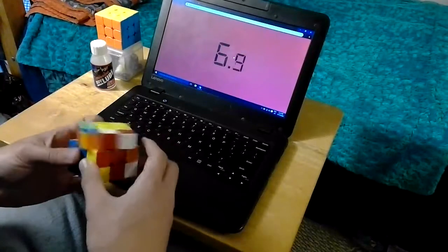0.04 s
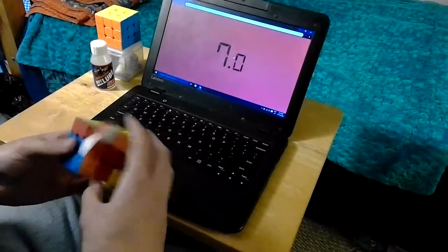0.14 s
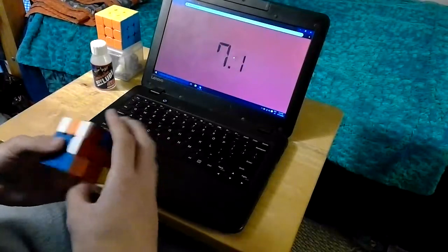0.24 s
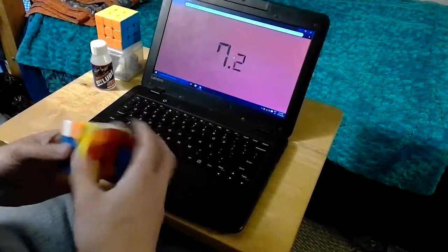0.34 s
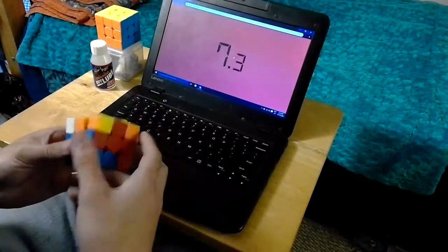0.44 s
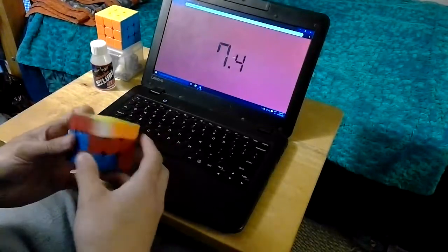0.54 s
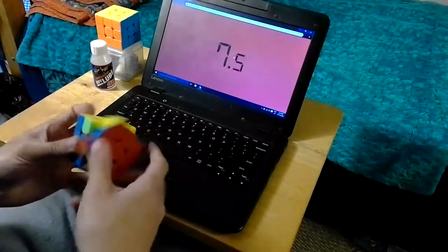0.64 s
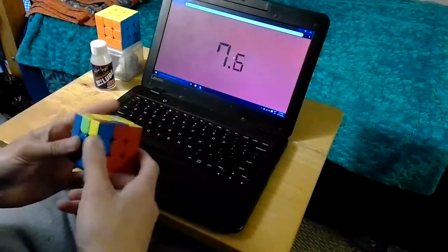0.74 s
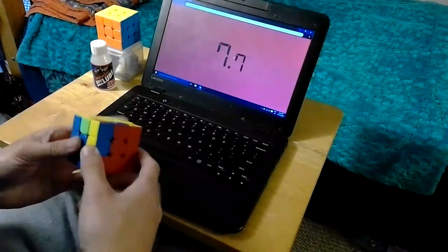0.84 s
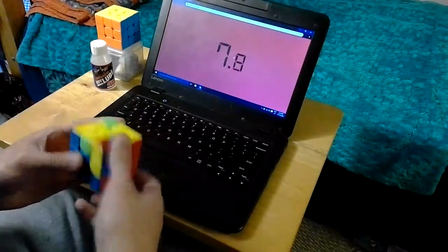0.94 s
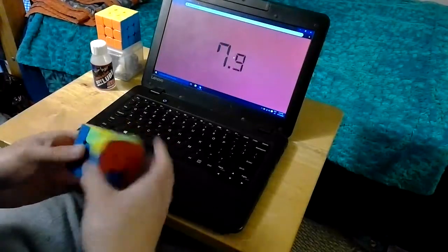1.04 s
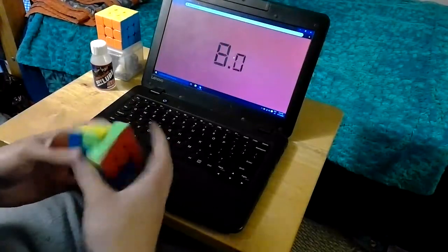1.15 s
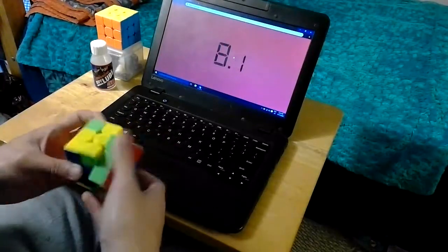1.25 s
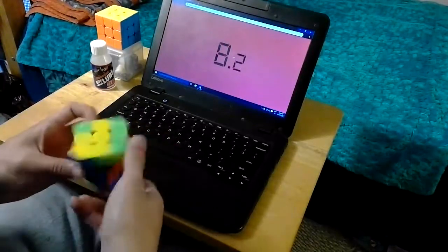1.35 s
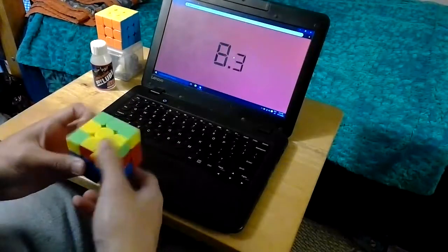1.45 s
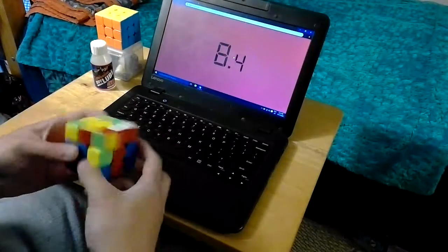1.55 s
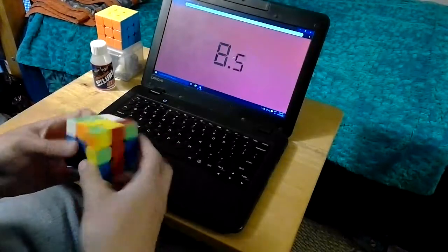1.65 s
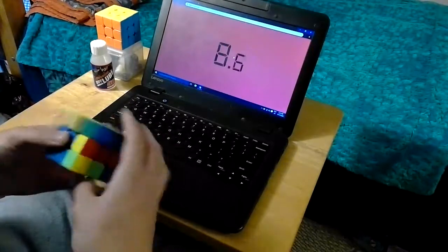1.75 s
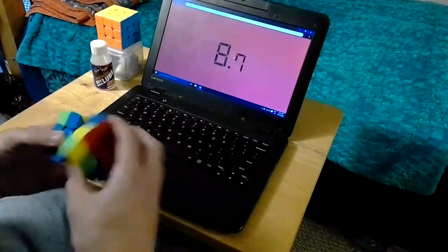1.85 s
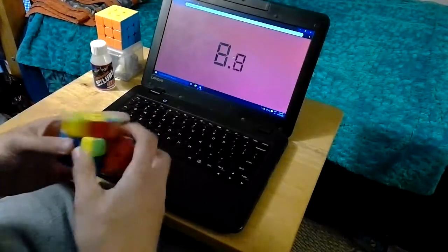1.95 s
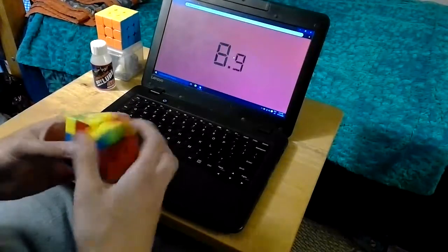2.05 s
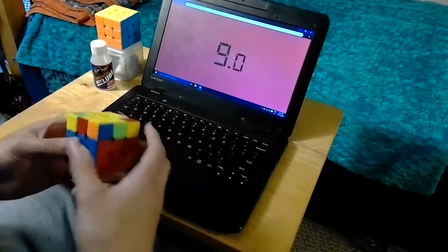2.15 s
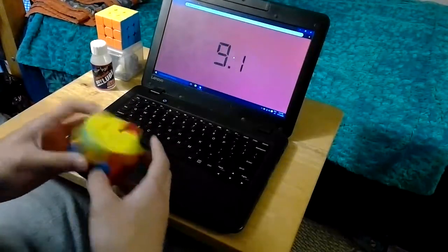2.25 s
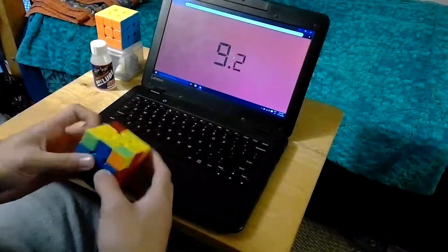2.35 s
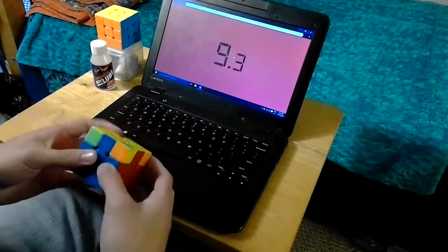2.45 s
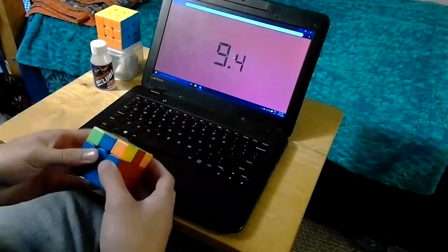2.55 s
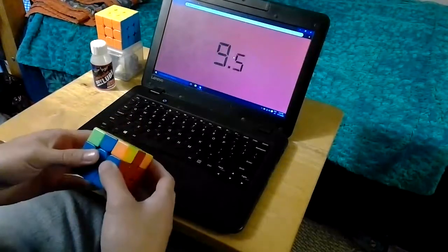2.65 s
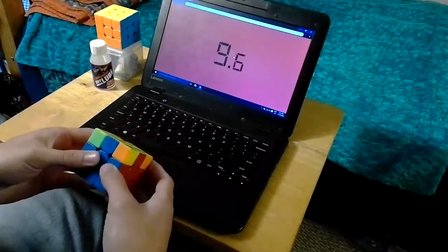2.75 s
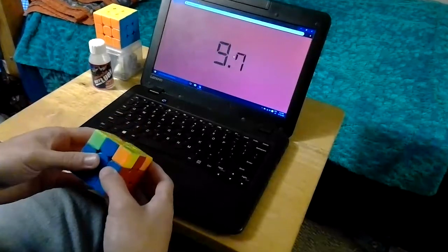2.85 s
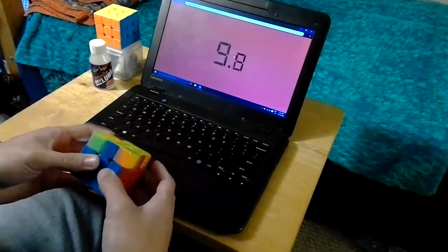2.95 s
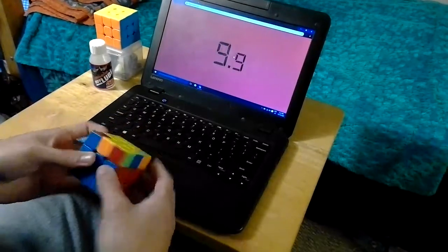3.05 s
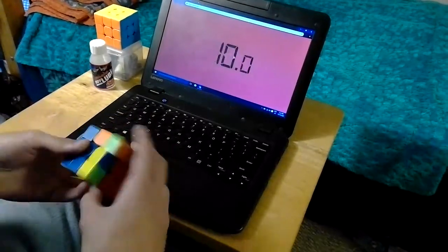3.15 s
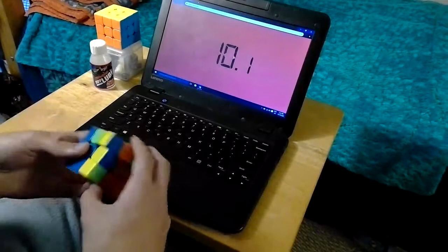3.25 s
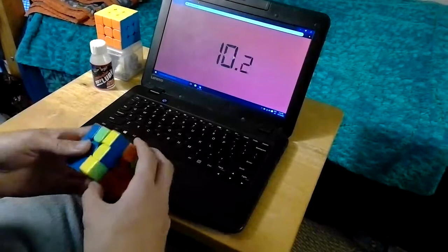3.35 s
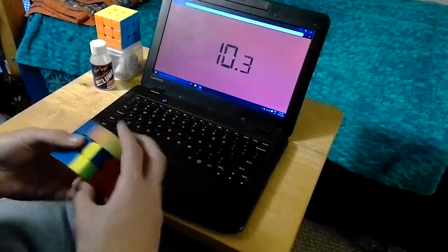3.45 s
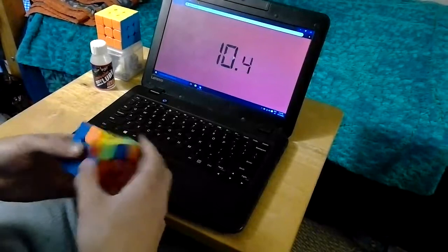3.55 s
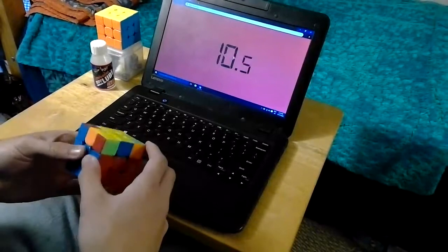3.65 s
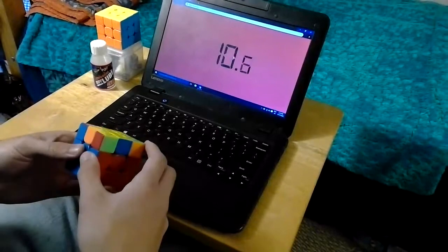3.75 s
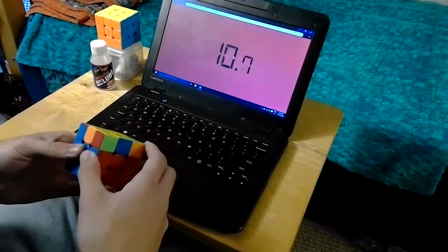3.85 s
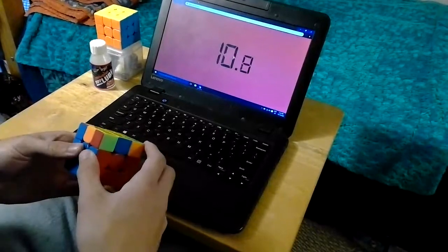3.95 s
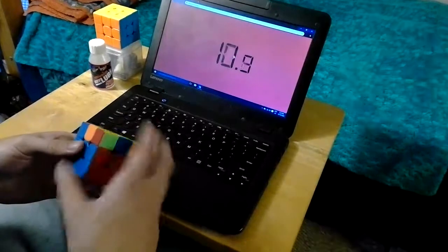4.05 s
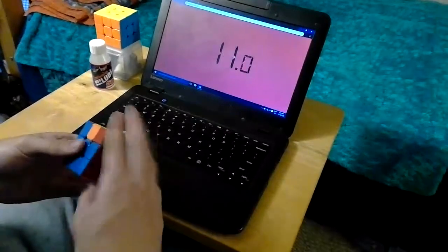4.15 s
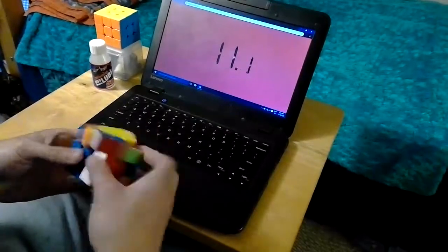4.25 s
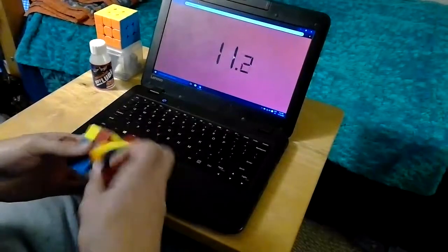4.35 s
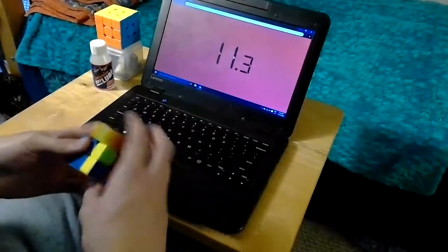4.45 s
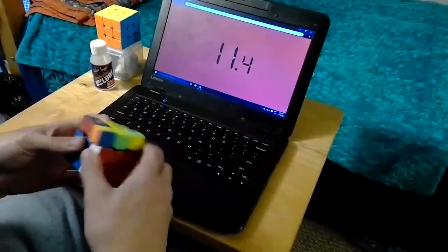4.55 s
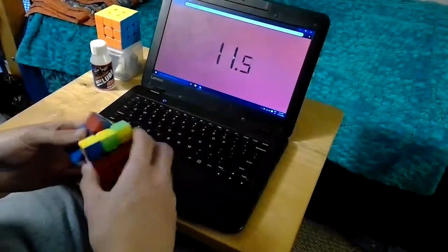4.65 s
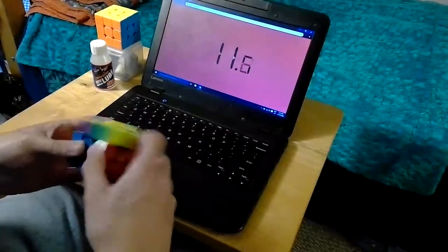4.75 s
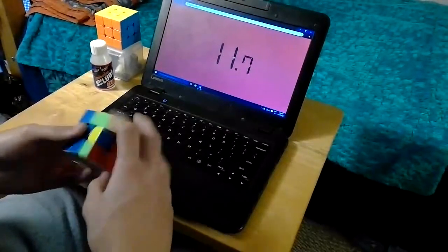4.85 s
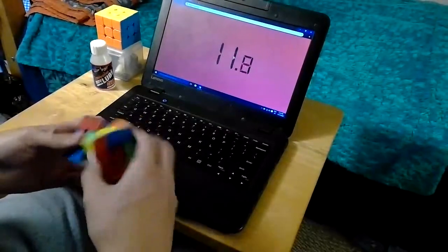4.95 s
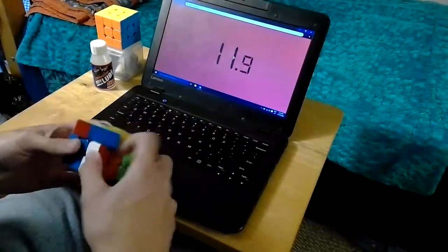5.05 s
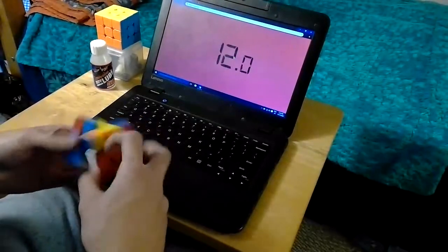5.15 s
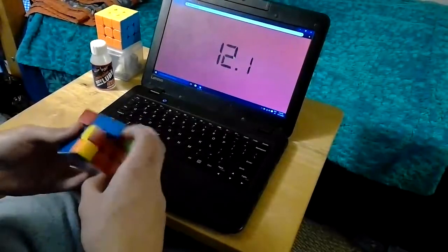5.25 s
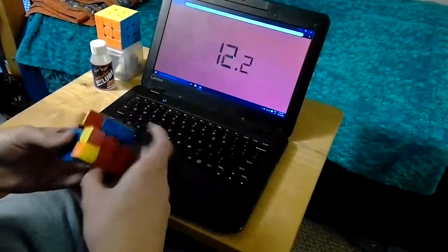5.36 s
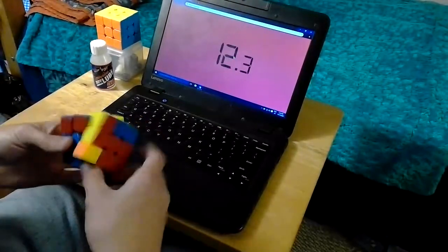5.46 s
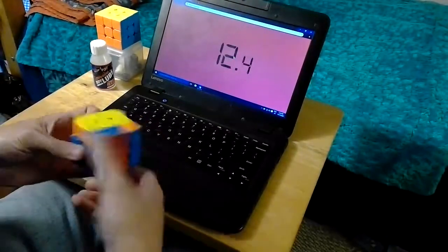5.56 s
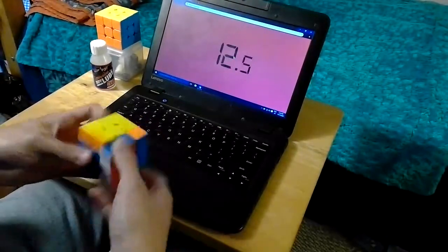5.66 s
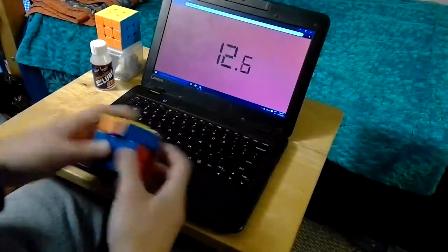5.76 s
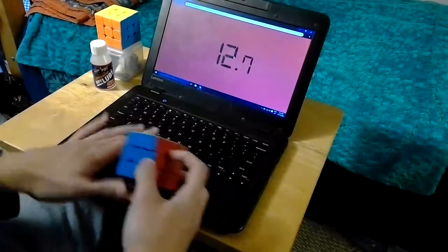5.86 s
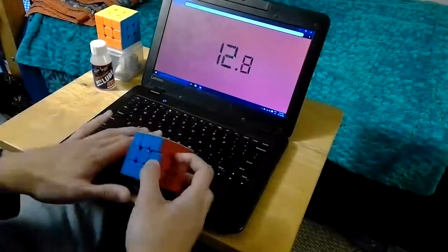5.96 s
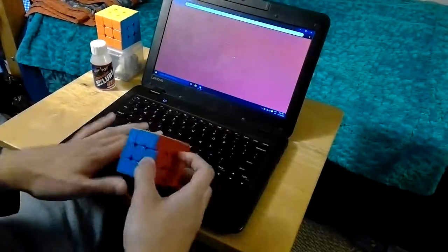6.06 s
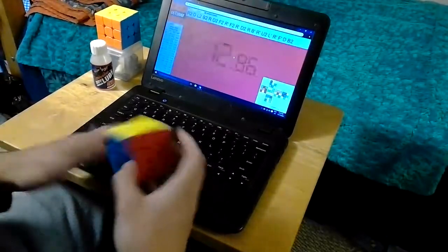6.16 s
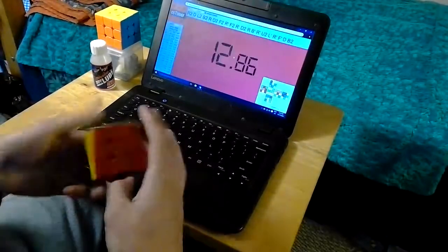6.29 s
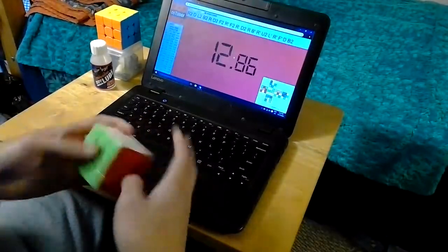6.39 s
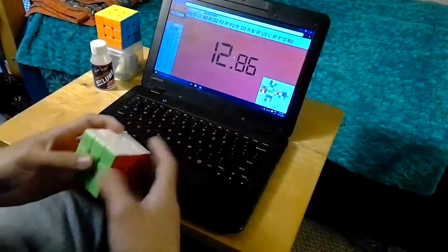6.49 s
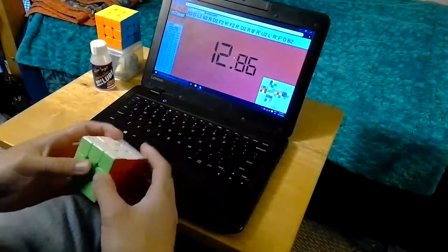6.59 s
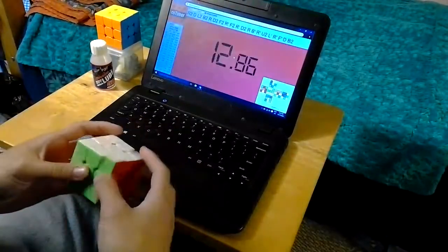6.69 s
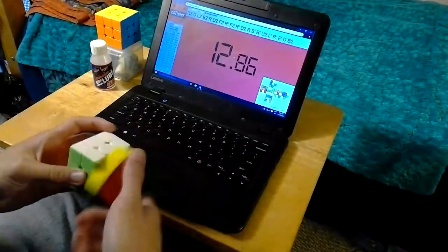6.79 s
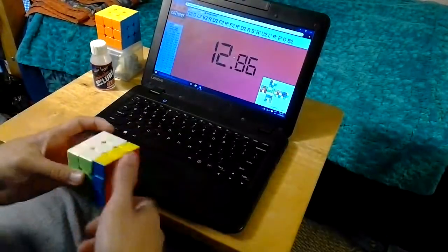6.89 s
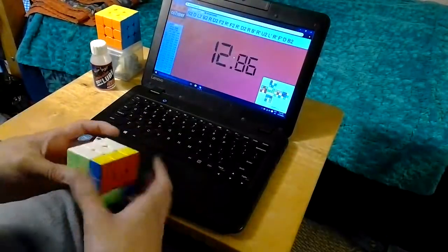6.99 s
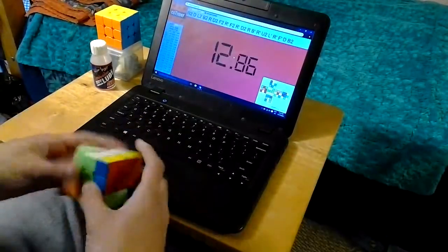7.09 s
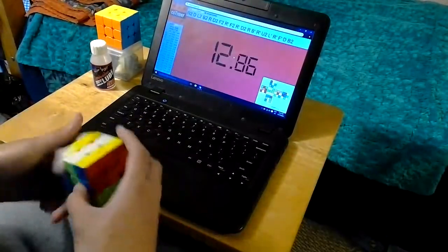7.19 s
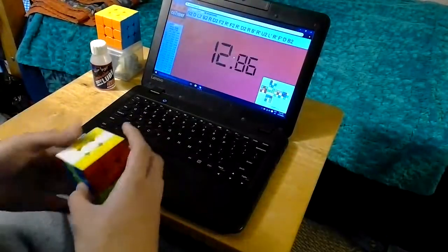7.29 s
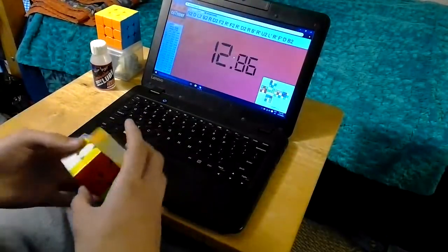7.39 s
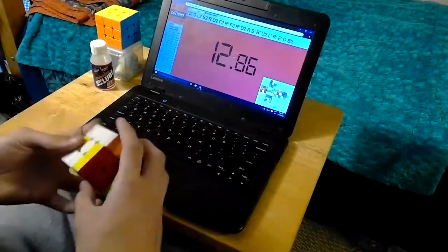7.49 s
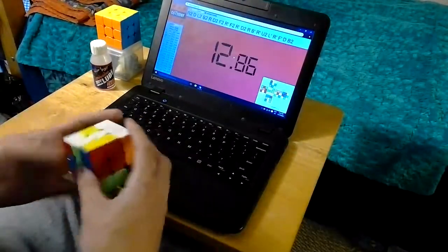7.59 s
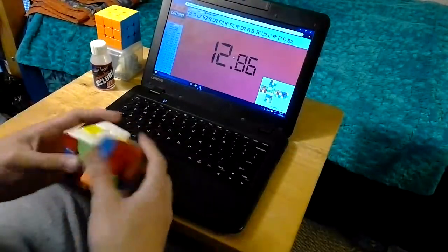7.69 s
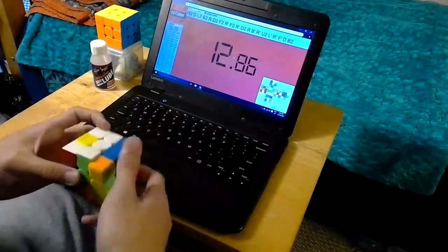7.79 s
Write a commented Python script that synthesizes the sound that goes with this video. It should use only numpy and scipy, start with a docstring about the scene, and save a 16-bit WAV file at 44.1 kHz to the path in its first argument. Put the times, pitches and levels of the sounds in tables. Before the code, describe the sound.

Close to the microphone in a small room, a plastic puzzle cube is turned in quick, uneven bursts of dry rasping, ticking and hollow clacks. After short pauses the turning becomes dense and louder, then a hand slaps laptop keys with a cracking thud. Softer, sparser twists follow over faint hiss and a very thin electronic whine.

```python
"""Over a faint hiss and whine, a plastic speed cube is twisted in fast bursts above a desk in a small room.
Sliding layers rasp by stick-slip, loose pieces tick, and clacks ring the shell as layers snap into line.
At one point a hand slaps the laptop's keys, cracking the plastic and thudding the desk, then shifts softly.
Nudges set the camera's stand swaying in decaying low sines; hands and sleeves brush as soft low noise.
Desk, screen and walls add dense, decaying echoes."""
import sys
import numpy as np
from scipy import signal
from scipy.fft import rfft, irfft, next_fast_len
from scipy.io import wavfile

SR = 44100
rng = np.random.default_rng(int(sys.argv[2]) if len(sys.argv) > 2 else 0)


def waveform_to_disk(signal):
    """Save audio, clipped to [-1, 1], as 16-bit WAV at the path in sys.argv[1]."""
    frames = np.transpose(np.atleast_2d(signal))
    scaled = np.clip(frames, -1, 1) * 32767
    samples = np.round(scaled).astype(np.int16)
    wavfile.write(sys.argv[1], SR, samples)


N = 345303
LEAD_S = 0.008  # time kept ahead of each clack for its leading scrape


def amp(db):
    """Logarithmic level: decibels to amplitude gain."""
    return 10 ** (np.asarray(db) / 20)


def unit(x):
    """Root-mean-square normalisation: scale to rms 1."""
    return x / np.sqrt(np.mean(x ** 2) + 1e-20)


def along(points, hz):
    """Logarithmic pitch scale: interpolate (frequency [Hz], value) points on a log axis."""
    f, v = np.transpose(points)
    return np.interp(np.log(hz + 1), np.log(f), v)


def filtered(x, response):
    """Linear filtering: multiply the spectrum of x by a response of frequency."""
    m = next_fast_len(len(x) + SR // 4)
    spectrum = rfft(x, m) * response(np.fft.rfftfreq(m, 1 / SR))
    return irfft(spectrum, m)[:len(x)]


def causal(gain):
    """Minimum phase: folding the cepstrum gives a response that rings only after it is struck."""
    cepstrum = irfft(np.log(np.maximum(gain, 1e-6)))
    half = cepstrum.shape[-1] // 2
    cepstrum[..., 1:half] *= 2
    cepstrum[..., half + 1:] = 0
    return np.exp(rfft(cepstrum))


def hump(hz, centre_hz, width_hz):
    """Resonance: a bell-shaped gain that is 1 at its centre."""
    return 1 / (1 + (2 * (hz - centre_hz) / width_hz) ** 2)


def add(track, s, sound):
    """Superposition: mix a sound into the track at time s."""
    start = int(np.clip(round(s * SR), 0, N - 1))
    track[start:start + len(sound)] += sound[:N - start]


def background(air_db=-67, whine_base_hz=825.65):
    """Stationary noise and harmonic tones: room air, microphone hiss and a thin electronic whine."""
    # spectrum of the air and hiss: (frequency [Hz], relative level [dB])
    air_spectrum = [(10, -10.5), (25, 0.5), (40, -7), (65, -14.5), (130, -22), (250, -27), (450, -32.5),
                    (1000, -36.5), (2500, -41.5), (6000, -42.5), (10000, -35), (14500, -35), (15700, -28.5),
                    (16000, -28.5)]
    # electronic whine: (multiple of the base pitch, rms level [dB])
    whine_tones = [(3, -99), (6, -94), (8, -94), (10, -92), (11, -84), (12, -98.5), (13, -92.5),
                   (14, -87.5), (15, -99), (17, -98), (19, -91)]
    t = np.arange(N) / SR
    air = unit(filtered(rng.standard_normal(N), lambda hz: amp(along(air_spectrum, hz))))
    whine = np.zeros(N)
    for multiple, db in whine_tones:
        cycles = multiple * whine_base_hz * t + rng.random()
        whine += amp(db) * np.sqrt(2) * np.sin(2 * np.pi * cycles)
    return amp(air_db) * air + whine


def handling(sway_hz=22.25, sway_t60=2.27, rise_s=0.028, brush_s=0.062, brush_hz=240, brush_width_hz=260):
    """Damped oscillation and friction noise: the nudged stand sways; hands and sleeves give soft low puffs."""
    # nudges of the camera stand: (time [s], sway level [dB])
    nudge_times = [(0.548, -50), (1.168, -52), (1.842, -58), (2.64, -51.5)]
    # soft brushes of hands and sleeves: (time of peak [s], level [dB])
    brush_times = [(.47, -75.5), (.83, -78.5), (1.2, -73), (1.88, -74.5), (4.3, -87), (4.9, -72.5)]
    t = np.arange(N) / SR
    track = np.zeros(N)
    sway_envelope = amp(-60 * t / sway_t60) * (1 - np.exp(-t / rise_s))
    sway = np.sin(2 * np.pi * sway_hz * t) * sway_envelope
    for s, db in nudge_times:
        add(track, s, amp(db) * sway)
    cloth = unit(filtered(rng.standard_normal(N), lambda hz: hump(hz, brush_hz, brush_width_hz)))
    strokes = sum(amp(db) * np.exp(-((t - s) / brush_s) ** 2) for s, db in brush_times)
    return track + cloth * strokes


def room(x, size=4096, delay_s=0.0045, build_s=0.0027, echo_db=5.0, echo_s=0.0012):
    """Reverberation: desk, screen and walls return echoes that change block by block as the cube moves."""
    # decay of the room: (frequency [Hz], t60 [s])
    wall_decay = [(150, 0.21), (1500, 0.19), (6000, 0.12), (15000, 0.11)]
    wet = np.zeros(N)
    for start in range(0, N, size):
        # treble dies away sooner than bass
        hz, t, z = signal.stft(rng.standard_normal(SR // 3), SR, nperseg=256)
        decay = amp(-60 * t / along(wall_decay, hz)[:, None])
        tail = signal.istft(z * decay, SR)[1]
        t = np.arange(len(tail)) / SR
        # uneven echo strength, then the wait and build-up before the echoes are dense
        unevenness = np.interp(t / echo_s, np.arange(len(t)), rng.standard_normal(len(t)))
        build = 1 - np.exp(-np.maximum(t - delay_s, 0) / build_s)
        tail = tail * amp(echo_db * unevenness) * build
        add(wet, start / SR, signal.fftconvolve(x[start:start + size], tail / np.linalg.norm(tail)))
    return wet


def contact(t, chatter, chatter_s, lead, lead_s, hit_s, press_s=0.00014):
    """Impact force at t = 0: a scrape leading in, a sharp blow, loose pieces chattering after."""
    before, after = np.maximum(-t, 0), np.maximum(t, 0)
    blow = unit(rng.standard_normal(len(t)) * np.exp(-before / press_s - after / hit_s))
    # random strength makes the noise spiky
    loose = rng.standard_normal(len(t)) * np.sqrt(rng.exponential(size=len(t)))
    rattle = unit(loose * (t >= 0) * np.exp(-after / chatter_s))
    scrape = unit(loose * (t < 0) * np.exp(-before / lead_s))
    return blow + chatter * rattle + lead * scrape


def blows(size=16384, keys_db=-11, keys_hz=850, keys_width_hz=1100, keys_t60=0.12):
    """Modal impact: a hard plastic crack over decaying laptop and desk modes; shaken keys chatter on."""
    # blows on the laptop's keys: (time [s], crack level [dB], thud level [dB])
    blow_times = [(5.816, -21.5, -37), (6.059, -54.5, -62.5)]
    # laptop and desk modes: (frequency [Hz], level within the thud [dB], t60 [s])
    desk_modes = [(70.7, -20, .2), (155, -21.5, 0.146), (321, -10, 0.045), (580, -5.5, 0.033),
                  (688, 0, 0.024), (834, -6.5, 0.051), (1103, -12, 0.022), (1686, -10.5, 0.034)]
    # colour of the crack: (frequency [Hz], relative gain [dB])
    shell_points = [(100, -22.5), (500, -7), (2700, -5.5), (4300, -0.5), (6500, -4), (12500, 1.5), (16000, -1.0)]
    track, hz = np.zeros(N), np.fft.rfftfreq(size, 1 / SR)
    early_s, span_s = 0.004, 0.004  # lead-in; duration over which the crack level is stated
    t = np.arange(size) / SR - early_s
    after = np.maximum(t, 0)
    shell = causal(amp(along(shell_points, hz)))
    for s, crack_db, thud_db in blow_times:
        force = contact(t, chatter=0.66, chatter_s=0.0026, lead=0.47, lead_s=0.0018, hit_s=0.0012)
        crack = unit(irfft(rfft(force) * shell)) * np.sqrt(span_s * SR / size)
        thud = np.zeros(size)
        for f, db, t60 in desk_modes:
            thud += rng.choice([-1, 1]) * amp(db - 60 * after / t60) * np.sin(2 * np.pi * f * after)
        keys = unit(filtered(rng.standard_normal(size), lambda f: hump(f, keys_hz, keys_width_hz)))
        keys = keys * (t > 0) * amp(-60 * after / keys_t60)
        add(track, s - early_s, amp(crack_db) * crack + amp(thud_db) * (thud + amp(keys_db) * keys))
    return track


def effort(rise_db_per_s, fall_db_per_s):
    """Exponential attack and decay: every flick rises, holds while the layer moves, then falls away."""
    # flicks of a layer: (start [s], length [s], drive level [dB], before the gain of each sound it drives)
    turn_times = [(0, 0.017, -56.5), (0.081, 0.058, -53.5), (0.161, 0.035, -51), (0.284, 0.035, -50),
                  (0.35, 0.068, -55.5), (0.475, 0.039, -45.0), (0.552, 0.037, -56.5), (0.614, 0.068, -53.5),
                  (0.991, 0.017, -48), (1.043, 0.057, -59), (1.247, 0.081, -62.5), (1.307, 0.016, -41),
                  (1.44, 0.054, -55.5), (1.542, 0.051, -55), (1.65, 0.055, -53), (1.707, 0.037, -43),
                  (1.82, 0.032, -56), (1.881, 0.06, -53), (1.999, 0.039, -53.5), (2.233, 0.021, -53),
                  (2.955, 0.012, -50), (3.07, 0.04, -56.5), (3.148, 0.03, -48), (3.387, 0.062, -51.5),
                  (3.511, 0.011, -49), (4.133, 0.12, -57.5), (4.255, 0.043, -39.5), (4.3, 0.041, -43.5),
                  (4.373, 0.074, -46.5), (4.468, 0.036, -46.5), (4.552, 0.055, -53), (4.611, 0.013, -40.5),
                  (4.696, 0.069, -44), (4.788, 0.029, -47), (4.846, 0.1, -50), (4.975, 0.061, -57),
                  (5.132, 0.012, -47), (5.187, 0.069, -55), (5.284, 0.074, -59.5), (5.398, 0.083, -53),
                  (5.471, 0.057, -43.5), (5.641, 0.068, -54), (5.738, 0.021, -38.5), (6.058, 0.011, -60),
                  (6.709, 0.052, -49.5), (6.778, 0.036, -61.5), (6.928, 0.12, -59), (7.08, 0.031, -48.5),
                  (7.124, 0.029, -43.5), (7.333, 0.015, -47), (7.388, 0.092, -56.5), (7.651, 0.076, -55)]
    t = np.arange(N) / SR
    level_db = np.full(N, -140.0)
    for s, length, db in turn_times:
        rise_db = rise_db_per_s * np.maximum(s - t, 0)
        fall_db = fall_db_per_s * np.maximum(t - s - length, 0)
        level_db = np.maximum(level_db, db - rise_db - fall_db)
    return amp(level_db)


def cube_gain(hz, shift=1):
    """Cavity resonance: thin plastic around small cavities, whose pitch shifts as gaps open and close."""
    # colour of the hollow plastic: (frequency [Hz], relative gain [dB])
    plastic_points = [(60, -40.5), (300, -23.5), (700, -15), (1200, -12.5), (1450, -4.5), (1850, -7.5),
                      (2250, -10.5), (3900, -7.5), (5000, -2.5), (6700, 1), (9500, 0), (12000, -0.5),
                      (14000, -1), (16000, -6.5)]
    # air cavity and wall resonances: (centre before the shift [Hz], width [Hz], added gain [dB])
    cavity_modes = [(1664, 110, -3.5), (3077, 95, 0.5), (6550, 230, -20.5)]
    resonance = sum(amp(db) * hump(hz, c * shift, w) for c, w, db in cavity_modes)
    return amp(along(plastic_points, hz)) * (1 + resonance)


def sliding(size=1024, rasp_db=-6, catches_per_s=400, catch_s=0.00065, scatter_db=5, smooth=0.074,
            tilt_db_per_octave=-1.5, start_db_per_s=1700, stop_db_per_s=898.5):
    """Stick-slip friction: layers catch hundreds of times a second, each catch a tiny burst of noise."""
    hz = np.fft.rfftfreq(size, 1 / SR)
    # the ridges pass at an uneven pace
    pace = np.repeat(rng.exponential(size=N // 64 + 1), 64)[:N]
    ridges = np.floor(np.cumsum(pace) * catches_per_s / SR)
    strength = amp(scatter_db * np.clip(rng.standard_normal(N), -2, 2))
    catches = (np.diff(ridges, prepend=0) > 0) * strength
    # each catch dies away exponentially over a little steady friction
    grip = unit(signal.lfilter([1], [1, -np.exp(-1 / (catch_s * SR))], catches)) + smooth
    tilt = amp(tilt_db_per_octave * np.log2(hz + 1))
    body = irfft(causal(cube_gain(hz) * tilt))
    rasp = unit(signal.fftconvolve(grip * rng.standard_normal(N), body)[:N])
    return amp(rasp_db) * rasp * effort(start_db_per_s, stop_db_per_s)


def rattling(count=750, kinds=26, jitter=0.35, tick_db=-2, scatter_db=5, bright=-0.66, bright_spread=3,
             grip_db_per_s=1400, settle_db_per_s=452, regrip_db_per_s=263, idle_db=-75):
    """Repeated impacts: loose pieces tick unevenly, in various colours, as hard as the cube is turned."""
    voices = [clack(bright + bright_spread * z) for z in rng.standard_normal(kinds)]
    # the fingers also shift faintly just before and after every flick
    regrip = np.minimum(effort(regrip_db_per_s, regrip_db_per_s), amp(idle_db))
    force = effort(grip_db_per_s, settle_db_per_s) + regrip
    track = np.zeros(N)
    draws = rng.standard_normal((count, 2))
    pieces = rng.integers(kinds, size=count)
    for k, ((late, strength), piece) in enumerate(zip(draws, pieces)):
        at = int(np.clip((k + jitter * late) * N / count, 0, N - 1))
        level = force[at] * amp(tick_db + scatter_db * np.clip(strength, -2, 1.5))
        add(track, at / SR - LEAD_S, level * voices[piece])
    return track


def clack(bright, size=2048, count=3, piece_hz=7800, piece_spread=0.346, piece_width_hz=600, piece_db=0,
          gap_spread=0.1, edge_hz=2200, span_s=0.004):
    """Struck resonator: one contact rings the cube and a few modes of the particular pieces that meet."""
    hz, t = np.fft.rfftfreq(size, 1 / SR), np.arange(size) / SR - LEAD_S
    body = cube_gain(hz, np.exp(gap_spread * rng.standard_normal()))
    piece_centres = piece_hz * np.exp(piece_spread * rng.standard_normal(count))
    pieces = sum(hump(hz, centre, piece_width_hz) for centre in piece_centres)
    tilt = amp(bright * np.log2(np.maximum(hz / edge_hz, 1)))  # small hard edges click brighter
    force = contact(t, chatter=0.76, chatter_s=0.0028, lead=0.35, lead_s=0.0018, hit_s=0.00031)
    sound = irfft(rfft(force) * causal(body * tilt * (1 + amp(piece_db) * pieces)))
    return unit(sound) * np.sqrt(span_s * SR / size)  # energy of rms 1 lasting span_s


def clacks(clack_db=0.5):
    """Impact excitation: pieces catch on each other and layers snap into line."""
    # the hardest clacks:
    # (time [s], level over 4 ms before the common gain clack_db [dB], brightness above 2200 Hz [dB per octave])
    clack_times = [(0.0945, -48.5, -3.5), (0.142, -44.5, -3.5), (0.1753, -42.0, -1.5),
                   (0.2792, -47.0, -2.5), (0.2872, -43.5, 0.5), (0.3603, -45.5, -2), (0.4037, -44, -1.5),
                   (0.4844, -26.5, 0.5), (0.556, -46.5, 0.5), (0.5715, -46, -5), (0.622, -45, 1.5),
                   (0.6637, -38, 6), (0.9682, -39.0, 1.5), (0.9873, -42.5, -3), (0.994, -33.5, -1.5),
                   (1.007, -43.5, -4.5), (1.0833, -50.5, 2.0), (1.2361, -48.5, 5), (1.3101, -33, 2.5),
                   (1.3234, -42.5, -1), (1.476, -49, 0.0), (1.5546, -38.5, 3.5), (1.6596, -47.5, 0),
                   (1.673, -42.5, 0), (1.7169, -38, -3.5), (1.733, -41.5, 0), (1.8359, -44.5, -2),
                   (1.9169, -45.5, -3.5), (1.9382, -35, -4.0), (1.9648, -37.0, 0.5), (2.004, -46, 1),
                   (2.0097, -38.5, -1), (2.1246, -57, 2), (2.2387, -42.5, -2), (2.9602, -45.5, 5),
                   (2.9902, -50, 10), (3.0545, -58, 3), (3.1582, -41.5, 1.5), (3.1639, -40.5, -0.5),
                   (3.186, -49, 8), (3.4087, -38, -2.5), (3.43, -45.5, -3), (3.453, -50.5, -5),
                   (3.5121, -40.0, -2), (4.172, -45.5, -3.5), (4.2071, -45.5, -1), (4.2354, -36, 1.5),
                   (4.2655, -26, -0.5), (4.2728, -36.5, -2.5), (4.277, -27, 1), (4.2827, -36, -1),
                   (4.2945, -34, 7), (4.331, -40, -1.5), (4.37, -28.5, 7.5), (4.384, -27, -0.5),
                   (4.42, -39, -0.5), (4.476, -39.0, -2.0), (4.507, -41, -1.5), (4.561, -44, 2),
                   (4.609, -33.5, 0.5), (4.6155, -35.5, -0.5), (4.684, -41.5, -2.5), (4.701, -28.5, 4.5),
                   (4.7556, -30.5, 3.5), (4.762, -39.5, -2), (4.7927, -35.5, -2.5), (4.8074, -33, -3),
                   (4.8274, -35, 0.0), (4.8807, -38, 3.5), (4.914, -42.5, 1), (4.9285, -40.5, 1.5),
                   (5.0026, -43.5, 1.5), (5.122, -45.5, 0), (5.1366, -32, 0.5), (5.143, -34.5, 1.5),
                   (5.186, -46, 2.5), (5.2122, -27.5, 0.5), (5.3228, -44, 0), (5.4168, -39, -1.5),
                   (5.426, -42, 1), (5.441, -44.5, 7), (5.4751, -43.5, -1.5), (5.5254, -35.5, -2.5),
                   (5.6477, -43, -2), (5.7362, -39.5, 4.5), (5.7653, -31, -1.0), (6.25, -42, 2.5),
                   (6.2948, -44, 0), (6.394, -56, 3.5), (6.524, -48.5, 1.0), (6.6949, -50.5, 0.5),
                   (6.706, -41.5, 2.0), (6.7224, -47, 5), (6.7639, -46.5, -6), (7.0218, -45.5, 3.5),
                   (7.045, -43.5, 12), (7.0912, -44.5, -3), (7.1081, -33.5, -1.5), (7.1462, -38, 0.5),
                   (7.152, -44.5, -4), (7.3305, -42.5, 0), (7.3405, -40, 6), (7.401, -45.5, -1.5),
                   (7.5921, -45, 1.0), (7.6443, -50.5, 4.0), (7.6922, -48, 1.0), (7.7478, -54.5, 6)]
    track = np.zeros(N)
    for s, db, bright in clack_times:
        add(track, s - LEAD_S, amp(db + clack_db) * clack(bright))
    return track


def scene():
    """Direct and reverberant sound: the cube close by, its room, and the quiet behind it."""
    turning = sliding() + rattling()
    # impacts radiate differently towards the microphone and towards the walls
    direct = turning + clacks() + blows()
    outward = turning + clacks() + blows()
    return (direct + amp(-15.0) * room(outward) + handling() + background())[None]


def record(dry, top_hz=15900):
    """Low-pass filtering: the camera cuts steeply above its band limit."""
    return filtered(dry[0], lambda hz: 1 / np.sqrt(1 + (hz / top_hz) ** 300))[None]


dry = scene()
out = record(dry)
waveform_to_disk(out)
```